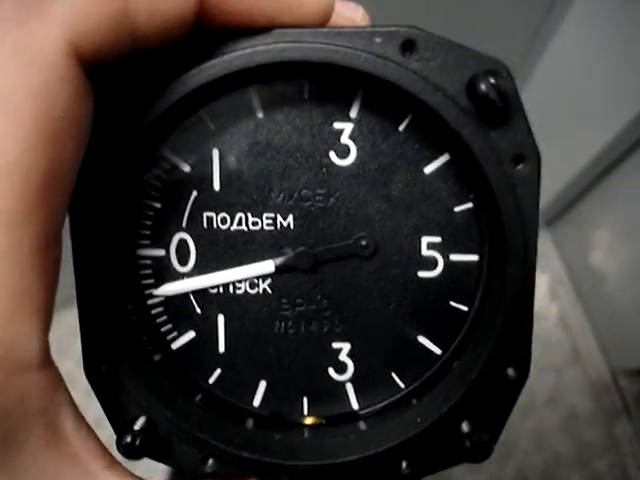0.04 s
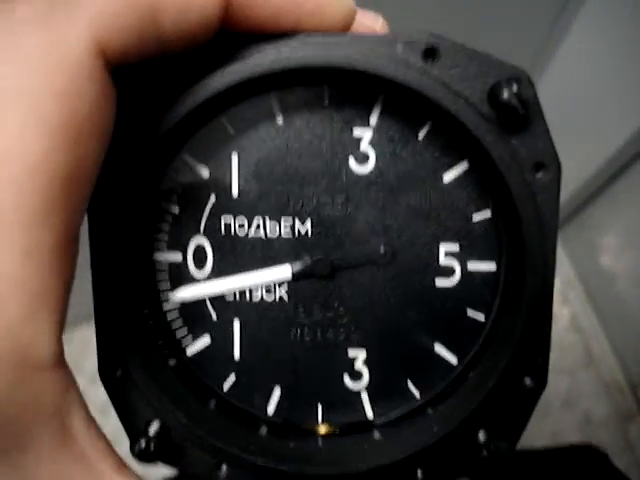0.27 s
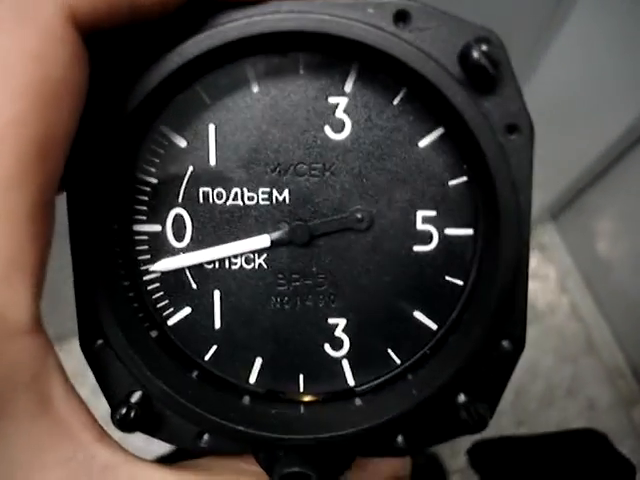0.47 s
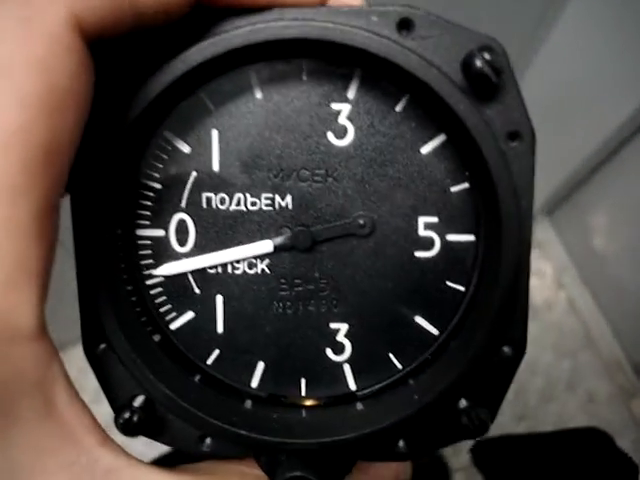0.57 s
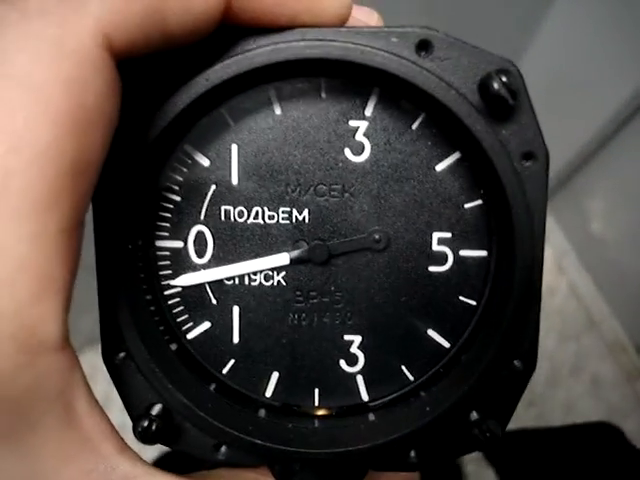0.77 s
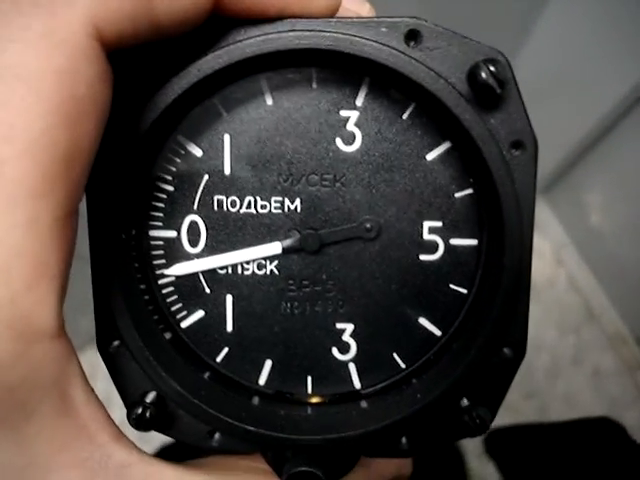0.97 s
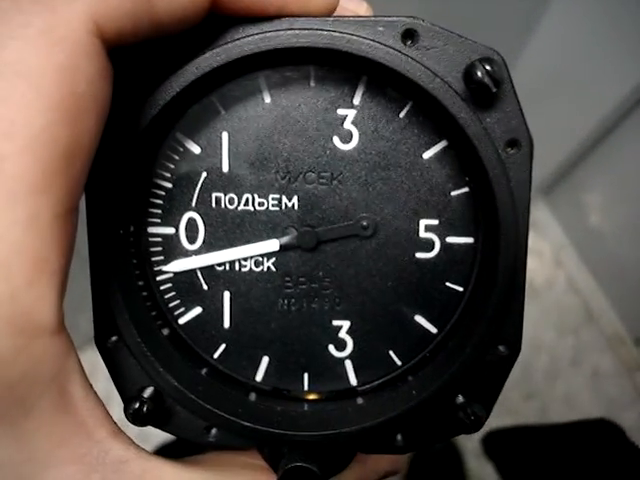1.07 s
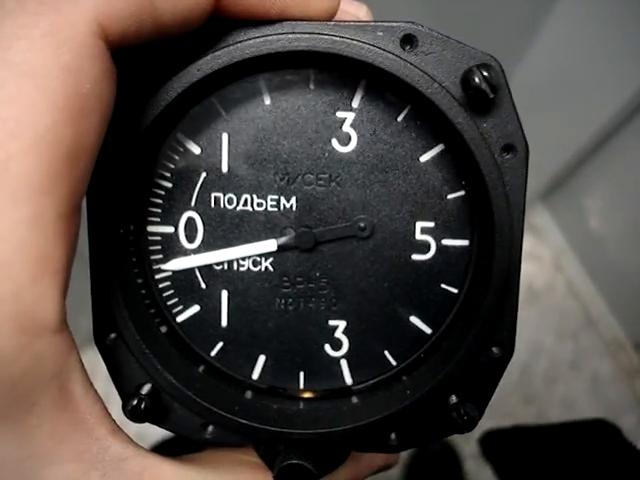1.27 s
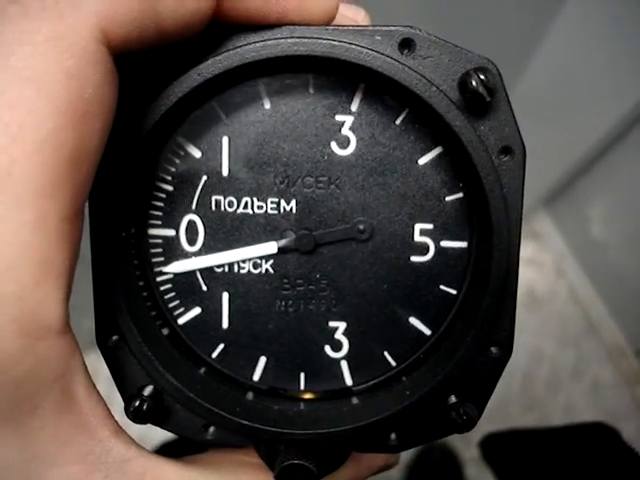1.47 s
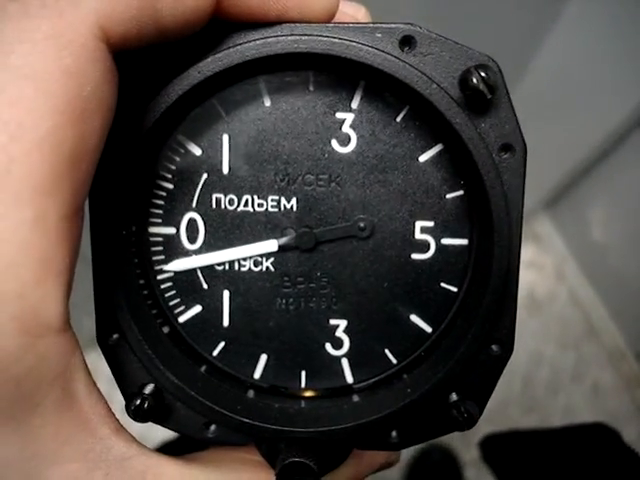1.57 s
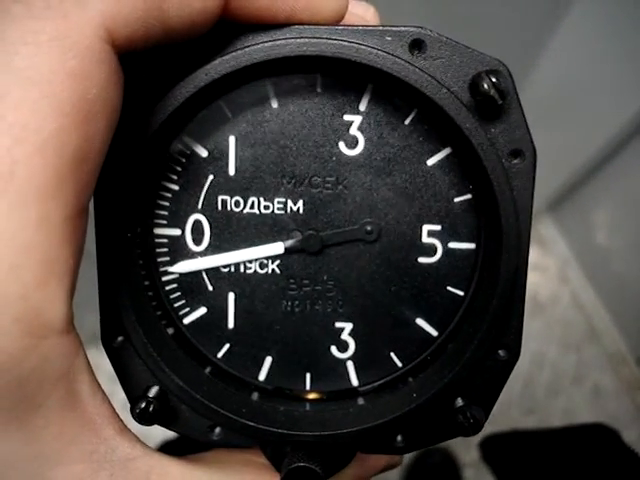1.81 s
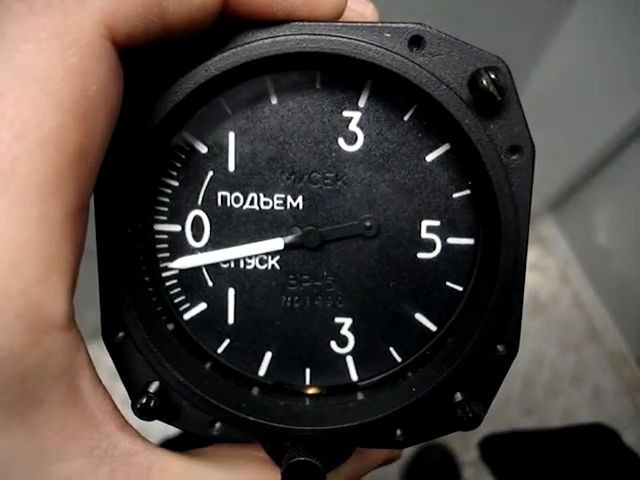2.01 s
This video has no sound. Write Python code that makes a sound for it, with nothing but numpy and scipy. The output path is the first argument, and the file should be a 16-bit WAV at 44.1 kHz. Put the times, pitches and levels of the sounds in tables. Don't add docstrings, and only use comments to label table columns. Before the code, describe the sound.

Metal freight elevator doors close: a latch clank, a gate clank, a loud slam and weakening rebounds over low roller rumble, then a reverberant tail and faint electrical buzz indoors, heard through a small camera microphone.

```python
import sys
import numpy as np
from scipy import signal
from scipy.fft import rfft, irfft
from scipy.io import wavfile
from scipy.ndimage import uniform_filter1d

SR = 44100
rng = np.random.default_rng(int(sys.argv[2]) if len(sys.argv) > 2 else 0)


def volts_from_decibels(level):
    exponent = np.asarray(level, float) / 20
    return 10 ** exponent


def master_out(mix):
    frames = np.transpose(np.atleast_2d(mix))
    ceiling = np.clip(frames, -1, 1)
    pcm = np.round(ceiling * 32767).astype(np.int16)
    wavfile.write(sys.argv[1], SR, pcm)


N = 90404
T = np.arange(N) / SR
MAINS_HZ = 50


def level(x, db):
    return x * volts_from_decibels(db) / np.sqrt(np.mean(x ** 2))


def fade(t, t60):
    return np.exp(-np.log(1000) * t / t60)


def band(x, lo_hz, hi_hz, order=2):
    return signal.sosfilt(signal.butter(order, [lo_hz, min(hi_hz, SR / 2.2)], "band", fs=SR, output="sos"), x)


def coloured(spectrum, flicker_db):
    f = np.fft.rfftfreq(N, 1 / SR) + 1
    hz, db = np.array(spectrum).T
    shaped = rfft(rng.standard_normal(N)) * volts_from_decibels(np.interp(np.log(f), np.log(hz), db))
    out = np.zeros(N)
    for octave in np.arange(4, 14.5, .5):
        flicker = np.interp(T, np.linspace(0, T[-1], 30), rng.standard_normal(30))
        weight = np.clip(1 - 2 * abs(np.log2(f) - octave), 0, 1)
        out += volts_from_decibels(flicker_db * flicker) * irfft(shaped * weight, N)
    return out


def quiet_floor():
    # f/Hz, level/dB per Hz
    floor_spectrum = [(20, 1.5), (45, 0.5), (160, -22), (330, -19.5), (1220, -27), (3240, -31.5),
                      (10000, -38.5)]
    return level(coloured(floor_spectrum, 0.42), -49)


def lamp():
    # f/Hz, level/dB
    hum_lines = [(86.1, -64.5), (500.6, -67)]
    # f/Hz, level/dB, t60/s
    buzz_rings = [(3165, -66.5, .07), (2200, -73, 0.032)]
    since_click = (T - .0168) % (1 / MAINS_HZ)
    click_size = volts_from_decibels(0.83 * rng.standard_normal(200))[(T * MAINS_HZ).astype(int)]
    out = np.zeros(N)
    for hz, db, t60 in buzz_rings:
        ring = np.sin(2 * np.pi * hz * since_click) * fade(since_click, t60)
        out += level(ring * click_size, db)
    for hz, db in hum_lines:
        out += level(np.sin(2 * np.pi * hz * T + hz), db)
    return out


def rollers():
    # t/s, level/dB
    rolling_level = [(0, -36), (.1, -37.5), (.2, -36), (.42, -39.5), (.6, -45.5), (1.0, -28), (1.2, -41.5),
                     (1.45, -51.5), (1.7, -54), (2.05, -57.5)]
    # f/Hz, level/dB per Hz
    track_spectrum = [(18, -20), (30, -3.5), (173, 0), (333, -12.5), (404, -4.5), (491, -23.5),
                      (626, -15.5), (5320, -28.5), (10000, -46), (13000, -91), (22000, -120)]
    when, db = np.array(rolling_level).T
    return level(coloured(track_spectrum, 1.5), 0) * volts_from_decibels(np.interp(T, when, db))


def ticks():
    # t/s, peak level/dB, f/Hz, t60/s
    fittings = [(1.055, -26.5, 7200, 0.17), (1.18, -31.5, 5100, 0.2), (1.279, -32, 5600, 0.13),
                (1.634, -44, 2330, 0.25), (1.99, -39.5, 3340, 0.14), (0.212, -25, 3550, 0.3),
                (0.443, -15.5, 5720, 0.21), (0.5824, -3, 2590, 0.055), (0.706, -6, 2600, 0.023),
                (0.8863, -12.5, 2380, 0.061)]
    out = np.zeros(N)
    for s, db, hz, t60 in fittings:
        rattle = level(band(rng.standard_normal(N), hz - 450, hz + 550), db - 15)
        out += rattle * fade(np.abs(T - s), t60) * (T > s)
    return out


def cracks():
    # t/s, peak level/dB, f/Hz, t60/s
    sharp_knocks = [(0.2097, -17.5, 1175, 0.059), (.218, -37.5, 3614, 0.17), (.448, -28, 1996, .1),
                    (0.455, -30, 1945, 0.078), (0.5843, -10, 2170, 0.012), (.5845, -18, 3300, .04),
                    (0.5839, -20.5, 4700, 0.04), (.595, -13, 1954, 0.025), (.604, -19.5, 2340, 0.018),
                    (.7068, -12, 2090, 0.013), (0.706, -21.5, 2936, 0.032), (0.709, -32.5, 4300, 0.064),
                    (0.717, -21, 2804, 0.035), (.724, -25.5, 3480, 0.055), (1.279, -56, 9540, 0.09),
                    (.914, -26.5, 2690, 0.026), (.73, -26.5, 1990, .06), (.443, -26, 1266, .08),
                    (0.216, -21, 1646, .1), (.8842, -21, 2090, 0.032), (.8842, -24.5, 3030, 0.027),
                    (.904, -20.5, 2060, 0.021), (.937, -26.5, 1990, 0.05), (1.001, -24.5, 1900, 0.043),
                    (1.012, -25, 1390, 0.055), (1.031, -31, 1704, 0.045), (1.059, -35.5, 1300, 0.041)]
    pair_ratio = 1.09
    out = np.zeros(N)
    for s, db, hz, t60 in sharp_knocks:
        u = np.maximum(T - s, 0)
        pair = np.sin(2 * np.pi * hz * u) + 0.33 * np.sin(2 * np.pi * pair_ratio * hz * u)
        out += volts_from_decibels(db) * fade(u, t60) * pair
    return out


def thumps():
    # t/s, peak level/dB, f/Hz, length/s
    booms = [(0.215, -18.5, 299, 0.056), (0.316, -44, 286.5, 0.18), (0.463, -28, 53.5, .08),
             (0.606, -30.5, 62.4, 0.07), (0.61, -15.5, 250, 0.038), (0.749, -32, 57, 0.048),
             (0.757, -15.5, 260.3, 0.047), (0.9387, -11.5, 250, 0.019), (0.9588, -11.5, 255, 0.022),
             (0.9763, -10.5, 262.6, 0.014), (.585, -23, 867, 0.015), (0.604, -30.5, 735, 0.095),
             (0.742, -27, 730, 0.031), (0.463, -19.5, 420, 0.02), (.475, -23.5, 153, 0.032),
             (.51, -26.5, 140, 0.044), (.51, -32, 522, 0.037), (.588, -24.5, 153.5, 0.051),
             (.63, -21.5, 197, 0.035), (0.702, -24.5, 417.4, 0.059), (.76, -27, 477.8, 0.08),
             (.835, -30, 187, 0.048), (0.9458, -15, 250, 0.0063), (.96, -25, 505, 0.047),
             (1.108, -27, 260, 0.027), (1.18, -32.5, 155, 0.055), (0.666, -27, 248, 0.037),
             (0.699, -17.5, 256, 0.035), (0.806, -20, 267, 0.026), (0.906, -20, 347, 0.032),
             (1.043, -16, 256.5, 0.023), (1.035, -20, 393.6, 0.028), (1.06, -30.5, 482, .03),
             (1.085, -22.5, 157, 0.043), (0.996, -33.5, 91, 0.19), (1.003, -17, 286.7, 0.035),
             (1.13, -23.5, 155, 0.052), (1.34, -39, 295.7, 0.097), (1.449, -38.5, 292, 0.16),
             (1.885, -50, 292, 0.18), (1.364, -46, 84, 0.14)]
    out = np.zeros(N)
    for s, db, hz, length in booms:
        u = np.maximum(T - s, 0)
        rise = 1 - fade(u, 0.51 * length)
        sag = volts_from_decibels(-8 * u / length)
        damping = fade(np.maximum(u - length, 0), 0.082)
        out += volts_from_decibels(db) * rise * sag * damping * np.sin(2 * np.pi * hz * u)
    return out


def knock_burst(length):
    draws = rng.random((12, 3))
    when = draws[:, 0] * (np.arange(12) > 0)
    size = volts_from_decibels(-5 * np.log(draws[:, 1]) - 3.7 * when) * np.sign(draws[:, 2] - .5)
    size[0] = abs(size).max()
    size /= np.sqrt(np.sum(size ** 2))
    return when * length, size


def struck_plate(modes, hits, which):
    field_db = [3, 8.5, 10, 1]
    # low-end t60/s, high-end t60/s
    field_t60 = [(0.67, 0.2), (0.3, 0.22), (0.38, 0.16), (0.24, 0.068)]
    # lowest f/Hz, split f/Hz, highest f/Hz
    field_hz = [(410, 420, 1900), (250, 1100, 8500), (1040, 1820, 8900), (133, 1700, 715)]
    contact_below = [4.4, 17, 3.57, 32]
    contact_above = [0.91, 1, 1.163, 1.48]
    lo, split, hi = field_hz[which]
    out, t = np.zeros(N), T[:SR // 2]
    for s, db, brightness, length in hits:
        when, size = knock_burst(length)
        push = np.zeros(SR // 10)
        np.add.at(push, (when * SR).astype(int), size)
        rings = np.zeros(len(t))
        for hz, mode_db, t60 in modes:
            spot = rng.standard_normal()
            reach = max(abs(size @ np.exp(2j * np.pi * hz * when)), .5)
            gain = np.sign(spot) * volts_from_decibels(mode_db + 0.92 * spot) / reach
            rings += gain * np.sin(2 * np.pi * hz * t) * fade(t, t60)
        hit = signal.fftconvolve(push, rings)[:len(t)]
        noise = level(band(rng.standard_normal(len(t)), lo, hi), field_db[which])
        low = band(noise, lo / 2, split, order=1)
        for crash, t60 in zip((low, noise - low), field_t60[which]):
            energy = signal.fftconvolve(push ** 2, fade(t, t60) ** 2)[:len(t)]
            hit += crash * np.sqrt(abs(energy))
        hit = band(hit, brightness / contact_below[which], brightness * contact_above[which])
        i = int(s * SR)
        out[i:i + len(hit)] += (hit * volts_from_decibels(db) / abs(hit).max())[:N - i]
    return out


def latch():
    # f/Hz, level/dB, t60/s
    latch_modes = [(392, -4, 0.25), (530, -17.5, 0.22), (600, -12, 0.075), (814, -4.5, 0.13),
                   (848, -1, 0.18), (1196, -2, 0.19), (1410, -14.5, 0.47), (1712, -9, 0.25),
                   (1670, -6.5, 0.13), (2240, -21.5, .18), (5010, 2, 0.29)]
    # t/s, peak level/dB, contact brightness f/Hz, chatter length/s
    latch_hits = [
        (0.21, -10.5, 1550, 0.019),
        (0.234, -16.5, 950, 0.032),
        (0.345, -58, 1180, 0.0084),
    ]
    return struck_plate(latch_modes, latch_hits, which=0)


def gate():
    # f/Hz, level/dB, t60/s
    gate_modes = [(277, -22, 0.45), (420, -3, 0.076), (541, -1.5, 0.16), (663, -6, 0.13), (1226, 2, 0.11),
                  (1644, -9, 0.32), (1900, 6.5, 0.071), (2640, -22, 0.19)]
    # t/s, peak level/dB, contact brightness f/Hz, chatter length/s
    gate_hits = [
        (0.209, -26, 7200, 0.02),
        (0.44, -20, 6140, 0.017),
        (.451, -12.5, 1374, 0.015),
        (.464, -15, 1520, .02),
        (0.483, -17, 670, 0.013),
    ]
    return struck_plate(gate_modes, gate_hits, which=1)


def panel():
    # f/Hz, level/dB, t60/s
    panel_modes = [(155, -12, 0.17), (195.6, -4, 0.23), (251.5, -2.5, 0.11), (274.5, 0, 0.058),
                   (356, -6.5, 0.54), (403.5, -10, 0.11), (506, -11.5, 0.12), (730, -23, 0.11)]
    # t/s, peak level/dB, contact brightness f/Hz, chatter length/s
    panel_hits = [(0.138, -28, 510, 0.021), (0.463, -20.5, 280, .02), (.585, -15.5, 540, 0.023),
                  (.612, -12, 417, 0.032), (.66, -19.5, 414, 0.027), (0.709, -16.5, 530, 0.033),
                  (.752, -17.5, 530, 0.032), (.8, -19.5, 407, 0.026), (.885, -23, 600, 0.019),
                  (0.91, -19.5, 450, .02), (1.003, -17.5, 520, .03), (1.03, -22, 500, 0.027),
                  (1.076, -24, 675, .03), (1.136, -25.5, 283, 0.024), (1.189, -32.5, 580, 0.027)]
    return struck_plate(panel_modes, panel_hits, which=3)


def leaf():
    # f/Hz, level/dB, t60/s
    leaf_modes = [(1309, -2.5, 0.29), (1478, -1, 0.21), (1676, -1.5, 0.24), (1900, -10.5, 0.11),
                  (2180, -4.5, 0.11), (2380, -11, 0.2), (2758, -5.5, 0.15), (2844, -11.5, 0.19),
                  (3273, -13, 0.1), (3520, -5.5, 0.08), (3800, -7, 0.13), (4770, -17, 0.14),
                  (5460, -26.5, .15)]
    # t/s, peak level/dB, contact brightness f/Hz,
    # chatter length/s
    leaf_hits = [(0.45, -23, 1880, .015), (0.5825, -6, 3800, .002), (0.634, -25.5, 4640, 0.055),
                 (0.7064, -11, 3420, .004), (0.726, -29.5, 2660, .03), (0.757, -23.5, 5000, .04),
                 (0.884, -21, 2290, .001), (.905, -21, 2150, .03), (0.943, -24.5, 4840, .04),
                 (.995, -20.5, 4680, .03), (1.04, -32, 2860, .04), (1.105, -38, 3020, .04)]
    return struck_plate(leaf_modes, leaf_hits, which=2)


def car(x):
    split_hz = 584
    noise = rng.standard_normal((2, N))
    bass = band(noise[0], 65, split_hz, order=1) * fade(T, 0.88)
    treble = band(noise[1], split_hz, 14000, order=1) * fade(T, 0.49)
    tail = (bass + .5 * treble) * (1 - fade(T, 0.13))
    return signal.fftconvolve(x, tail * volts_from_decibels(-16) / np.sqrt(np.sum(tail ** 2)))[:N]


def scene():
    doors = ticks() + cracks() + thumps() + panel() + gate() + latch() + leaf()
    return (quiet_floor() + lamp() + rollers() + car(doors) + doors)[None]


def thinned_treble(x):
    threshold_db, spread_db, from_hz, tilt_db_per_khz = -37.5, 12, 4500, 3.5
    f, _, z = signal.stft(x, SR, nperseg=512)
    power = abs(z) ** 2
    for lo in np.arange(1000, 11000, 700):
        if lo <= from_hz:
            continue
        rows = (f >= lo) & (f < lo + 700)
        under = 10 * np.log10(power[rows].sum(0) / power.sum(0) + 1e-12)
        under += spread_db * uniform_filter1d(rng.standard_normal(z.shape[1]), size=2)
        under += tilt_db_per_khz * (lo - from_hz) / 1000
        z[rows] *= np.clip((under - threshold_db) / 2 + .5, 0, 1)
    return signal.istft(z, SR, nperseg=512)[1][:N]


def treble_dropouts(x):
    # start t/s, end t/s, lowest f/Hz, highest f/Hz
    gaps = [
        (0.42, 0.436, 1157, 15000),
        (0.564, 0.579, 1760, 15000),
        (0.858, 0.879, 2070, 2400),
        (1.25, 1.278, 9200, 15000),
        (1.248, 1.278, 5000, 7500),
    ]
    for start, end, lo_hz, hi_hz in gaps:
        gap = np.clip(np.minimum(T - start, end - T) / .002 + .5, 0, 1)
        sos = signal.butter(6, [lo_hz, hi_hz], "band", fs=SR, output="sos")
        x = x - gap * signal.sosfiltfilt(sos, x)
    return x


def roll_off(x):
    return signal.sosfilt(signal.butter(12, 10380, fs=SR, output="sos"), x)


def record(dry):
    x = signal.sosfilt(signal.butter(3, 36, "high", fs=SR, output="sos"), dry[0])
    x = treble_dropouts(thinned_treble(x))
    x = signal.sosfilt(signal.ellip(10, .3, 70, 9940, fs=SR, output="sos"), x)
    return roll_off(x)


dry = scene()
out = record(dry)
master_out(out)
```